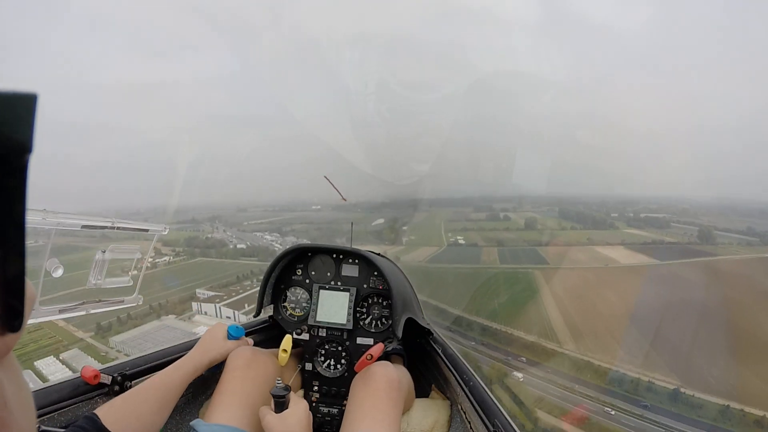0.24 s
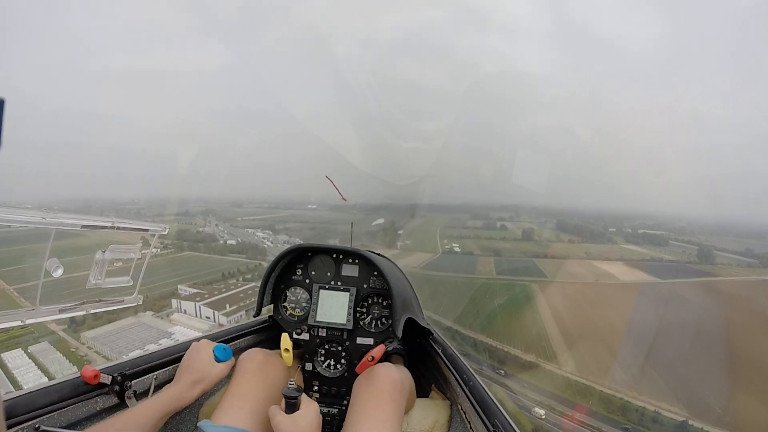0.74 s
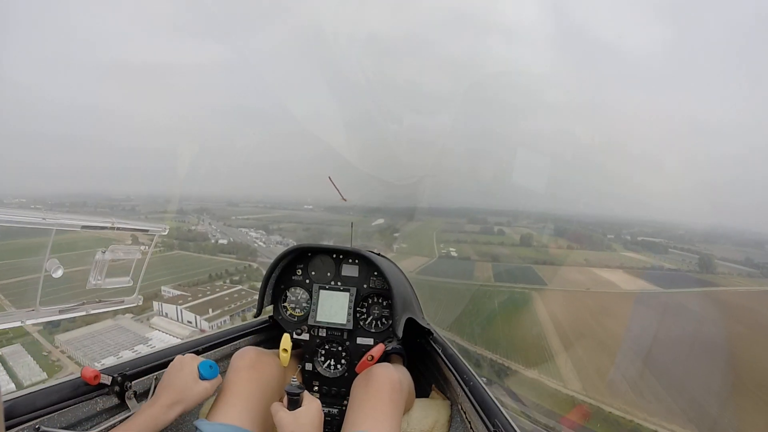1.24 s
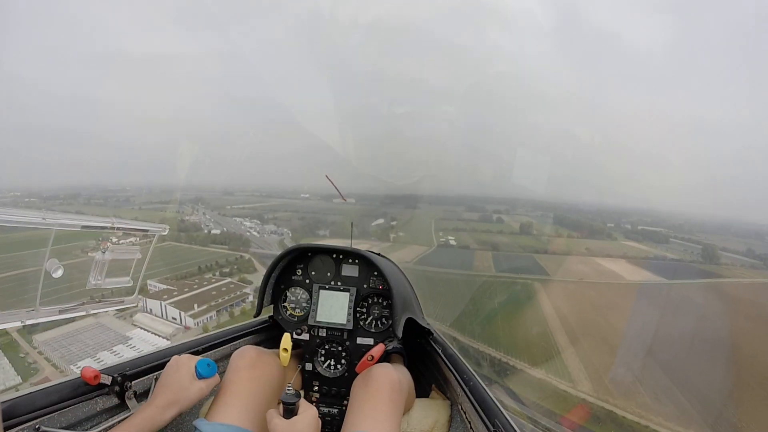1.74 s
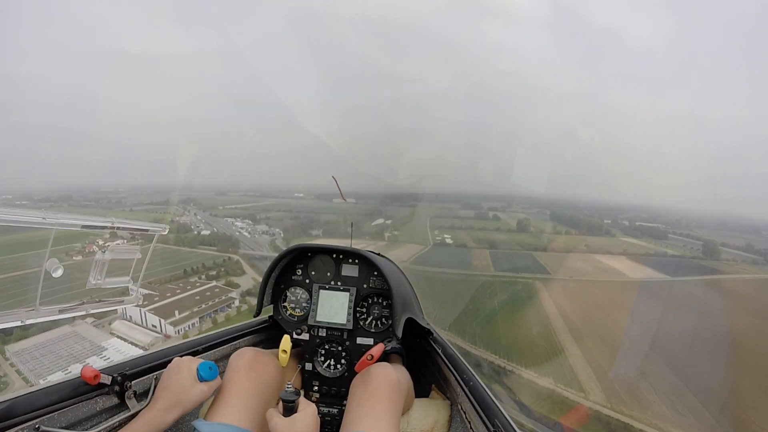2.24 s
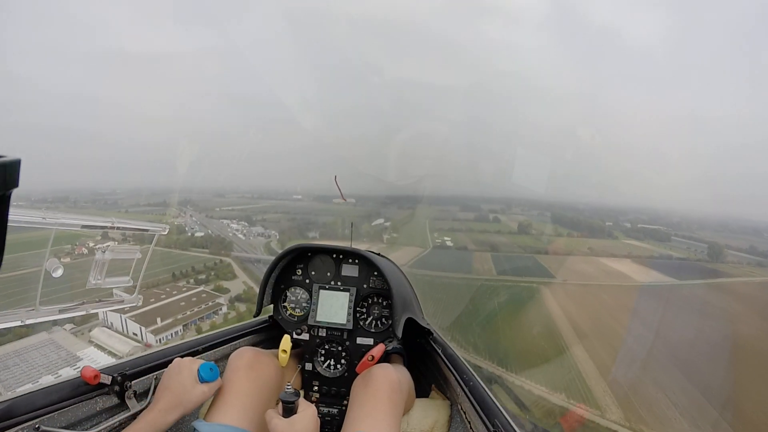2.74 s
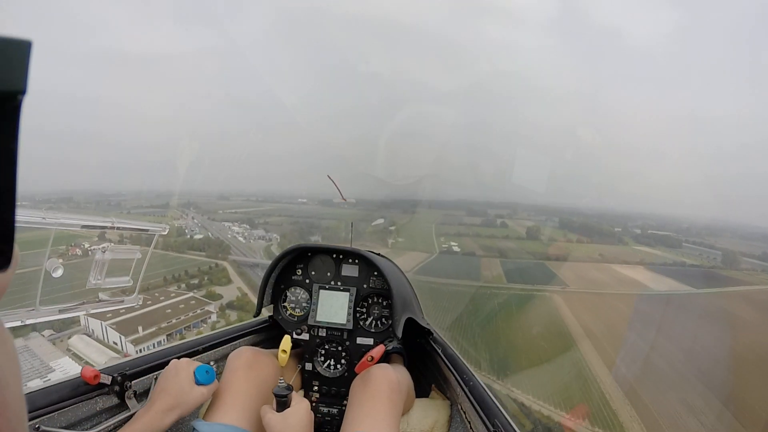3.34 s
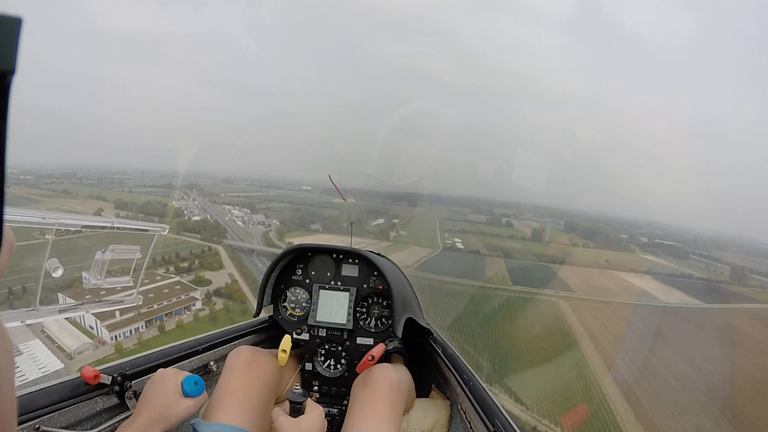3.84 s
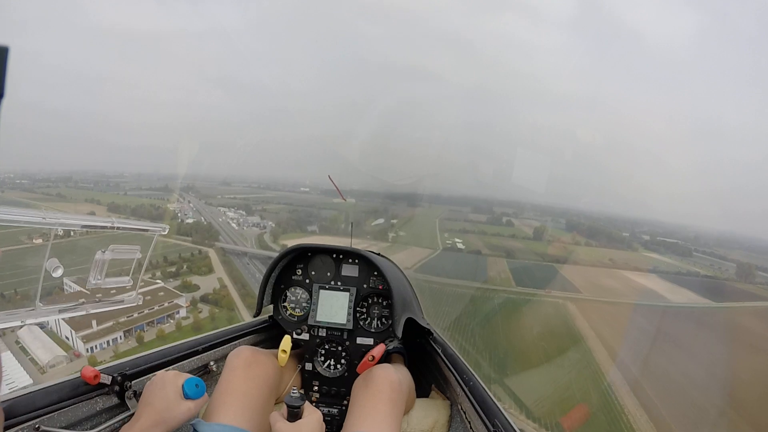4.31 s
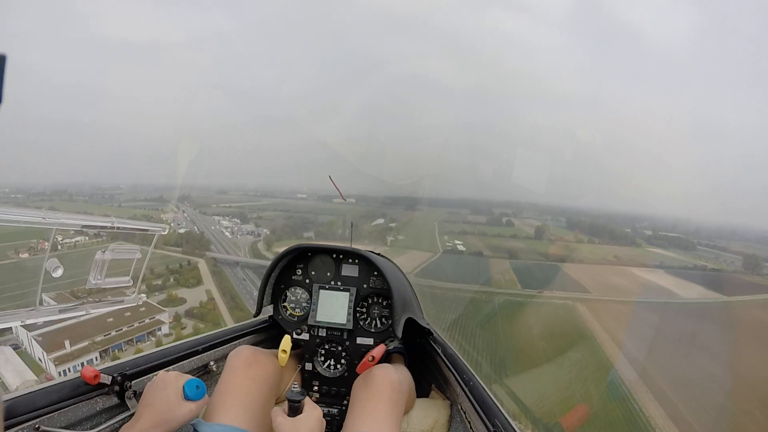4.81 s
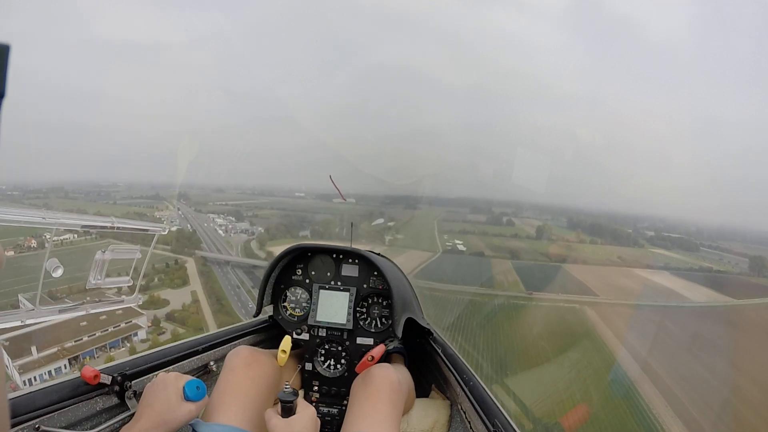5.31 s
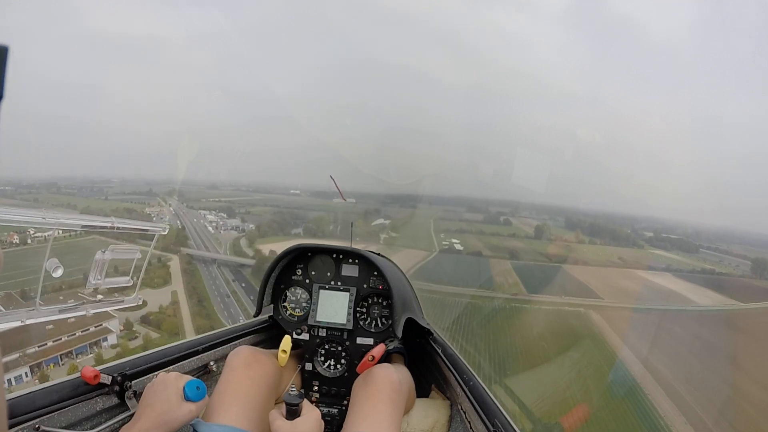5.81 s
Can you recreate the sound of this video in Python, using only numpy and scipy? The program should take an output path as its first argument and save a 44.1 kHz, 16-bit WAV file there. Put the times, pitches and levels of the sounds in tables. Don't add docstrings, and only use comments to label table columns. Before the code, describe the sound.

Throughout the six seconds, a steady, dark rush of air passes over a glider canopy, heard from inside the small cabin by a microphone in a closed housing. Beneath it, a very deep wing boom swells and fades irregularly with a low, wavering fuselage hum. Small dry linkage knocks tick at about 0.1, 0.3 and 0.6 s. From 0.8 s a lever is pulled along its rail: gritty scraping with dull rattles, strongest around 0.9 s, and a faint very high squeak near 0.95 s. It nearly pauses around 1.08 s, then pushes on. At 1.22 s it slams into its stop, a hard, clipped clack with a short thud, bouncing twice within 0.04 s and shaking the frame. The rush settles again. Isolated knocks follow at 2.3 and 2.6 s, a sharper cluster at 3.0 s, another at 3.8 s, and faint ones near 4.4 and 4.75 s. Wind and rumble continue to the end.

```python
import sys
import numpy as np
from scipy import signal
from scipy.io import wavfile
from scipy.ndimage import uniform_filter1d

SR = 44100
rng = np.random.default_rng(int(sys.argv[2]) if len(sys.argv) > 2 else 0)


def transcribe(signal):
    frames = np.atleast_2d(signal).T
    limited = np.clip(frames, -1, 1)
    pcm = np.round(limited * 32767).astype(np.int16)
    wavfile.write(sys.argv[1], SR, pcm)


def voltage_ratio(decibels):
    exponent = np.asarray(decibels, float) / 20
    return 10 ** exponent


N = 267246

# f/Hz, density/dB per Hz
AIR_COLOUR = [(24, -26), (40, -17.5), (101, -8.5), (294, -24.5), (377, -20), (438, -25.5), (562, -26.5),
              (817, -32), (1490, -25), (1960, -30.5), (2990, -32), (3560, -34.5), (6160, -42.5),
              (12400, -67), (15500, -69)]
# f/Hz, width/Hz, lift/dB
HOUSING_MODES = [(51, 18, -8), (155, 32, 2.5), (230.6, 52, 5.5), (610, 200, 3.5), (1626, 230, 3),
                 (2240, 270, 4.5), (3007, 290, 6), (3816, 89, 5), (4810, 1440, 4), (6240, 920, 6.5),
                 (7170, 670, 5), (9620, 1100, 6.5), (12300, 4700, 7.5)]
# middle t/s, level/dB, f/Hz, length/s
BOOM_GUSTS = [(.18, -35.5, 31.8, .3), (.36, -48, 31, .2), (.61, -34, 29.6, 0.18), (.96, -23.5, 30.3, 0.22),
              (1.2, -22.5, 30.5, 0.35), (1.42, -27.5, 30.46, 0.28), (1.65, -31.5, 30.6, 0.28),
              (1.9, -31, 30.4, 0.29), (2.04, -28, 31.2, 0.12), (2.2, -32.5, 31, 0.23),
              (2.42, -32.5, 29, 0.28), (2.58, -30, 29, 0.17), (2.72, -26, 28.4, 0.23),
              (2.88, -26.5, 29, 0.21), (3.1, -29.5, 28.78, 0.53), (3.26, -25, 29, 0.18),
              (3.46, -27.5, 30.3, 0.32), (3.67, -35, 30.7, 0.23), (3.84, -29, 31.4, 0.19),
              (4.01, -28.5, 31, 0.22), (4.19, -31.5, 31.9, 0.23), (4.43, -33.5, 30.9, 0.2),
              (4.69, -29.5, 31.7, 0.37), (4.93, -31.5, 33.2, 0.38), (5.13, -32, 32, 0.16),
              (5.3, -30, 30.3, 0.51), (5.55, -28, 30.13, 0.24), (5.77, -29, 30.3, 0.19),
              (5.92, -27.5, 30, 0.27)]
# middle
# t/s, level/dB, f/Hz, length/s
HUM_GUSTS = [(.02, -34.5, 98.2, 0.18), (.22, -31.5, 95.5, 0.32), (.47, -37, 93, 0.31),
             (.6, -29, 93.5, 0.22), (.75, -32, 93.6, 0.24), (.95, -30.5, 92, 0.24),
             (1.14, -32.5, 92.6, .15), (1.25, -27, 89.75, 0.15), (1.38, -29, 96.1, 0.13),
             (1.59, -42, 88.5, 0.12), (1.78, -32, 94.3, 0.16), (2.0, -37, 100.6, 0.15),
             (2.14, -36.5, 98.5, 0.2), (2.26, -28.5, 97.4, 0.071), (2.42, -33.5, 95, 0.22),
             (2.74, -34.5, 96.4, 0.26), (3.2, -34, 97, 0.12), (3.32, -31, 97.3, 0.077),
             (3.43, -35.5, 92.4, .15), (3.72, -32, 93.84, 0.45), (3.88, -33, 94.1, 0.18),
             (4.08, -31.5, 94, 0.11), (4.37, -34, 95.3, 0.28), (4.65, -35, 95, 0.18),
             (3.04, -33.5, 86.4, 0.16), (5.15, -33, 102.1, 0.11), (5.3, -36, 95.6, 0.17),
             (5.62, -36, 93.2, 0.17), (5.75, -33.5, 92.3, 0.11), (5.93, -33.5, 95, 0.66)]
# t/s, level/dB
VENT_DRAUGHT = [(0, -50), (.7, -57), (1.0, -54), (1.2, -40), (1.45, -48.5), (2.04, -47), (2.2, -64),
                (2.7, -56), (3.1, -54.5), (3.4, -50), (3.65, -42.5), (3.75, -65), (3.92, -48.5),
                (4.2, -53.5), (6.06, -51.5)]
# f/Hz, level/dB, t60/s
PANEL_MODES = [(1000, -6, .022), (1260, -2, .022), (1520, 0, .022), (1780, -1, .022), (2120, -1, .02),
               (2400, -5, .018), (2900, -12, .018), (3750, -18, .018)]
# t/s, peak level/dB, main f/Hz, cabin ring/dB re peak
LINKAGE_KNOCKS = [(0.105, -20.5, 1330, -27), (0.118, -22, 2320, -18), (0.316, -33.5, 1330, -9),
                  (0.509, -37.5, 1500, 0.5), (0.611, -19.5, 2380, -14), (0.662, -22.5, 1490, -10.5),
                  (2.298, -17.5, 1290, -19.5), (2.589, -23, 2380, -10), (2.66, -29.5, 2240, -6),
                  (3.0136, -19.5, 1660, -7), (3.019, -13, 2260, -14), (3.026, -24, 1300, -6.5),
                  (3.499, -28, 1663, -16), (3.707, -35, 1496, -0.5), (3.782, -18, 1350, -12.5),
                  (3.925, -35.5, 1050, -0.5), (4.385, -27, 1280, -11), (4.756, -26, 1670, -27)]
# t/s, peak level/dB, f/Hz, rise/s, t60/s
LOOSE_RINGS = [
    (.668, -26, 500, .003, .03),
    (.662, -36, 1080, .003, .04),
    (1.083, -31, 1400, .004, .06),
    (1.112, -38, 1350, .006, .06),
    (1.15, -36, 2250, .006, .05),
]
# t/s, level/dB, f/Hz, width/Hz, t60/s
SPRING_SQUEAKS = [
    (.932, -51, 12000, 250, .12),
    (.957, -58, 12900, 500, .05),
]
# t/s, effort level/dB
PUSH_EFFORT = [
    (0.79, -40.5),
    (0.864, -38),
    (0.882, -30),
    (0.9, -36),
    (0.964, -34),
    (0.985, -43.5),
    (1.076, -57.5),
    (1.09, -42.5),
    (1.215, -33.5),
]
# t/s, peak level/dB, main f/Hz, cabin ring/dB re peak, tick/dB re peak
LEVER_RATTLES = [
    (0.823, -25, 1730, -8.5, -14),
    (0.873, -14.5, 1600, -16, -41),
    (0.923, -19, 1380, -11, -36),
    (0.94, -19, 2240, -7, -15.5),
    (0.95, -24, 1390, -3, -28),
    (0.963, -15, 1300, -12, -29),
    (1.015, -22.5, 1315, -10.5, -33),
    (1.135, -31, 1670, -3, -29),
    (1.194, -44, 1360, 1, -16),
]
# t/s, peak level/dB, f/Hz, cabin ring/dB re peak, tick/dB re peak
STOP_SLAMS = [
    (1.224, 1, 1420, -14, -33),
    (1.246, -10, 1420, -17, -30),
    (1.263, -5, 1430, -18, -36),
]


def evened(x):
    return x / np.sqrt(np.mean(x ** 2) + 1e-20)


def curves(rows):
    s, *columns = np.transpose(rows)
    return [np.interp(np.arange(N) / SR, s, c) for c in columns]


def add(mix, s, sound):
    part = mix[round(s * SR):][:len(sound)]
    part += sound[:len(part)]


def resonate(x, hz, width):
    turn = np.exp(2j * np.pi * np.cumsum(hz * np.ones(len(x))) / SR)
    r = np.exp(-np.pi * width / SR)
    return 2 * (turn * signal.lfilter([1 - r], [1, -r], x / turn)).real


def band(x, low_hz, high_hz):
    return signal.sosfilt(signal.butter(N=4, Wn=[low_hz, high_hz], btype="band", fs=SR, output="sos"), x)


def ring(hz, t60, rise):
    t = np.arange(6000) / SR
    shape = (1 - np.exp(-t / max(rise, 1e-4))) ** 2 * voltage_ratio(-60 * t / t60)
    return shape / shape.max() * np.sin(2 * np.pi * hz * t)


def airflow():
    frames, hz = N // 512 + 5, np.fft.rfftfreq(2048, 1 / SR)
    a, b, patches = rng.standard_normal((frames, 1025, 3)).T
    patches = evened(uniform_filter1d(uniform_filter1d(patches, size=24, axis=0), size=6, axis=1))
    f, level = np.transpose(AIR_COLOUR)
    colour_db = np.interp(np.log(hz + 1), np.log(f), level)
    colour_db += sum(lift_db / (1 + (2 * (hz - f) / width) ** 2) for f, width, lift_db in HOUSING_MODES)
    patch_db = 0.44 + 1.52 / (1 + (hz[:, None] / 700) ** 2)
    spectra = (a + 1j * b) * voltage_ratio(colour_db[:, None] + patch_db * patches)
    rush = signal.istft(spectra, nperseg=2048, noverlap=1536)[1][:N]
    flicker = evened(uniform_filter1d(rng.standard_normal(N), size=900))
    return voltage_ratio(-43 + .5 * flicker) * rush / np.std(band(rush, 120, 15500))


def gusts(rows):
    out, t = np.zeros(N), np.arange(N) / SR
    for (s, db, hz, length), turn in zip(rows, rng.random(len(rows))):
        near = abs(t - s) < length / 2
        swell = voltage_ratio(db + 0.5) * np.cos(np.pi * (t[near] - s) / length)
        out[near] += swell * np.sin(2 * np.pi * (hz * t[near] + turn))
    return out


def shaken_mode(hz, db, width):
    return voltage_ratio(db) * evened(resonate(resonate(rng.standard_normal(N), hz, width), hz, 2 * width))


def airframe():
    boom, hum = gusts(BOOM_GUSTS), gusts(HUM_GUSTS)
    draught_db, = curves(VENT_DRAUGHT)
    swell_db = 10 * np.log10(abs(uniform_filter1d(evened(boom) ** 2, size=4000)) + .01)
    wing = boom + shaken_mode(31.9, -48.5, 4.6)
    fuselage = hum + shaken_mode(95, -41.5, 13.5)
    shell = shaken_mode(70.6, -39.5 + 0.23 * swell_db, 15.3)
    cabin_air = shaken_mode(378.6, draught_db, 25.6)
    return wing + fuselage + shell + cabin_air


def panel(x):
    modes = sum(voltage_ratio(db) * ring(hz, t60, .0002) for hz, db, t60 in PANEL_MODES)
    ringing = band(signal.oaconvolve(x, modes)[:len(x)], 500, 4200)
    return evened(ringing) + voltage_ratio(-4) * evened(band(x, 750, 2300))


def knock(peak_db, hz, cabin_db, tick_db, draws):
    t = np.arange(len(draws)) / SR
    contact_s = 0.004
    echoes = voltage_ratio(-13 - 60 * t / 0.038)
    chatter = draws * (np.exp(-t / contact_s) + echoes) * (1 - np.exp(-(t / 0.0011) ** 2))
    chatter += 4.3 * np.exp(-((t - .0022) * SR) ** 2)
    chatter = np.pad(chatter, (0, 4500))
    body = evened(panel(chatter)) + voltage_ratio(-4) * evened(resonate(resonate(chatter, hz, 310), hz, 640))
    tick = band(chatter, 3500, 7500)
    cabin = ring(383.2, 0.1, 0.0026) + voltage_ratio(-0.5) * ring(483, 0.041, 0.00083)
    cabin += voltage_ratio(-6.5) * ring(214.0, 0.066, 0.0039) + voltage_ratio(-2) * ring(620, 0.022, 0.0024)
    sound = body / abs(body).max() + voltage_ratio(tick_db + 5.5) * tick / abs(tick).max()
    add(sound, .004, voltage_ratio(cabin_db - 0.5) * cabin)
    return voltage_ratio(peak_db) * sound


def squeak(db, hz, width, t60, draws):
    t = np.arange(len(draws)) / SR
    whistle = evened(resonate(resonate(draws, hz, width), hz, width))
    return voltage_ratio(db - 60 * t / t60) * (1 - np.exp(-t / .004)) ** 2 * whistle


def lever_scrape():
    effort_db, = curves(PUSH_EFFORT)
    t = np.arange(N) / SR
    moving = np.interp(t, [.81, .835, 1.21, 1.222], [0, 1, 1, 0])
    rod_hz = 1660 - 900 * np.clip(t - PUSH_EFFORT[0][0], 0, .35)
    grip = voltage_ratio(3.2 * evened(uniform_filter1d(rng.standard_normal(N), size=300)))
    strength = voltage_ratio(1.1 * np.minimum(rng.exponential(1, N), 3)) * rng.standard_normal(N)
    slips = grip * strength * (rng.random(N) < 2500 / SR)
    rod = resonate(resonate(slips, rod_hz, 690), rod_hz, 1100)
    scrape = voltage_ratio(effort_db + 2) * evened(voltage_ratio(-0.5) * panel(slips) + evened(rod))
    rasp = voltage_ratio(effort_db - 25) * evened(band(slips, 2500, 5900))
    return moving * (scrape + rasp)


def frame_shake():
    effort_db, = curves(PUSH_EFFORT)
    t = np.arange(N) / SR
    push = rng.standard_normal(N)
    shake = evened(band(push, 92, 235)) + voltage_ratio(-1.0) * evened(band(push, 242, 635))
    shake += voltage_ratio(-10.5) * evened(resonate(push, 372, 19))
    pushing = np.interp(t, [.75, .79, 1.21, 1.222], [0, 1, 1, 0]) * voltage_ratio(-30 + 0.62 * (effort_db + 32.5))
    r = np.exp(-1 / (0.021 * SR))
    shaking = signal.lfilter([1 - r], [1, -r], pushing)
    for s, peak_db, *_ in STOP_SLAMS:
        since = np.maximum(t - s, 0)
        aftershake = voltage_ratio(peak_db - 21.5 - 60 * since / 0.05)
        settling = voltage_ratio(peak_db - 41.5 - 60 * since / 1.44)
        shaking += (t > s) * (aftershake + settling)
    return shaking * evened(shake)


def slam(peak_db, hz, cabin_db, tick_db, draws):
    t = np.arange(len(draws)) / SR
    blow = np.exp(-((t - .0031) / 0.0015) ** 2) * np.sin(2 * np.pi * hz * t)
    tail = evened(panel(draws)) * (1 - np.exp(-(t / .003) ** 2)) * voltage_ratio(-60 * t / .04)
    crack = evened(band(draws, 2600, 4300)) + voltage_ratio(-8) * evened(band(draws, 4300, 6300))
    crack += voltage_ratio(-32) * evened(band(draws, 6800, 15000)) + voltage_ratio(14) * evened(band(draws, 2190, 2900))
    crack += voltage_ratio(16.5) * evened(band(draws, 470, 1370))
    crack *= (1 - np.exp(-(t / 0.0018) ** 2)) * (voltage_ratio(-60 * t / 0.02) + voltage_ratio(-27 - 60 * t / 0.014))
    thud = ring(390, 0.065, 0.004) + voltage_ratio(-26) * ring(240, 0.07, 0.0028) + voltage_ratio(-7) * ring(91, 0.22, 0.0038)
    sound = voltage_ratio(cabin_db) * thud
    sound[:len(t)] += blow + voltage_ratio(-9) * tail + voltage_ratio(tick_db + 14) * crack
    return voltage_ratio(peak_db - 2.2) * sound


def scene():
    mix = airflow() + airframe() + lever_scrape() + frame_shake()
    contacts = [(*row, -38) for row in LINKAGE_KNOCKS] + LEVER_RATTLES
    for (s, *rest), draws in zip(contacts, rng.standard_normal((len(contacts), 2000))):
        add(mix, s - .0015, knock(*rest, draws))
    for s, db, hz, rise, t60 in LOOSE_RINGS:
        add(mix, s, voltage_ratio(db) * ring(hz, t60, rise))
    for (s, *rest), draws in zip(SPRING_SQUEAKS, rng.standard_normal((len(SPRING_SQUEAKS), 4000))):
        add(mix, s, squeak(*rest, draws))
    for (s, *rest), draws in zip(STOP_SLAMS, rng.standard_normal((len(STOP_SLAMS), 3000))):
        add(mix, s - .0015, slam(*rest, draws))
    return mix[None]


def band_limit(x):
    return signal.sosfilt(signal.butter(12, 16290, fs=SR, output="sos"), x)


def record(dry):
    lowpass = signal.firwin(767, 15150, window=("kaiser", 6), fs=SR)
    limited = signal.oaconvolve(dry, lowpass[None], "same")
    return band_limit(np.clip(limited, -1, 1))


dry = scene()
out = record(dry)
transcribe(out)
```